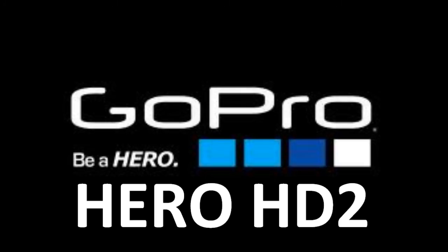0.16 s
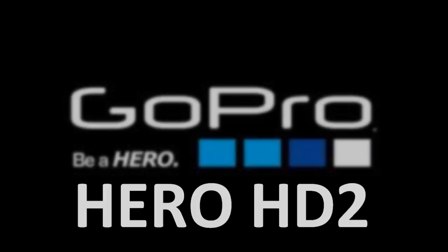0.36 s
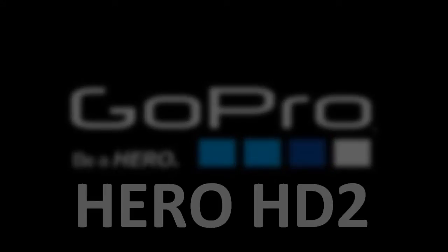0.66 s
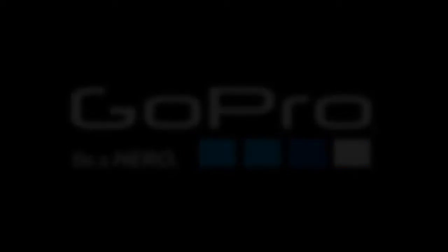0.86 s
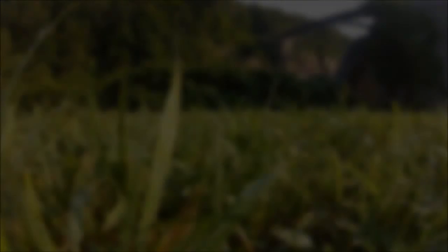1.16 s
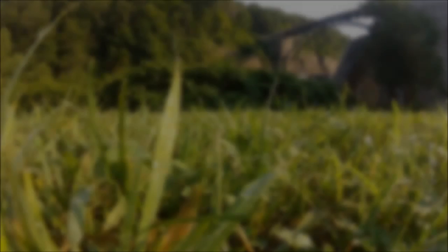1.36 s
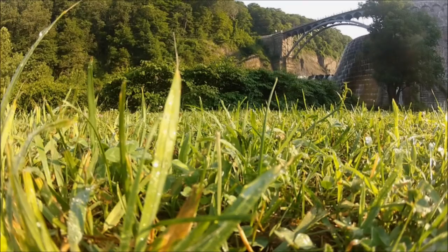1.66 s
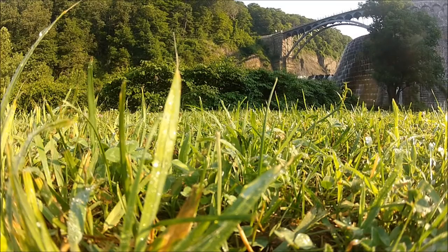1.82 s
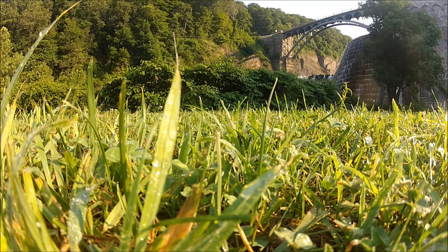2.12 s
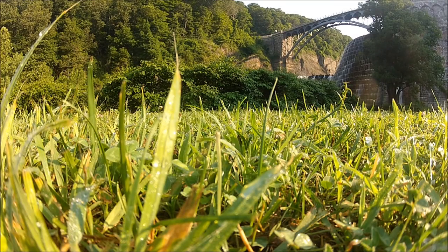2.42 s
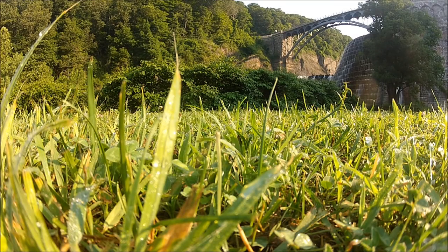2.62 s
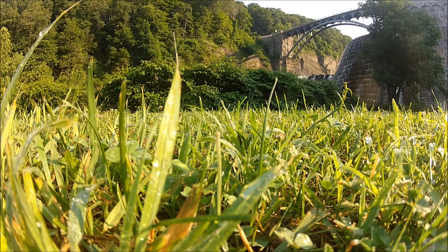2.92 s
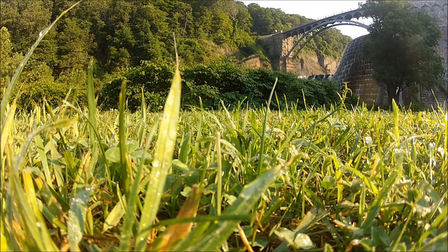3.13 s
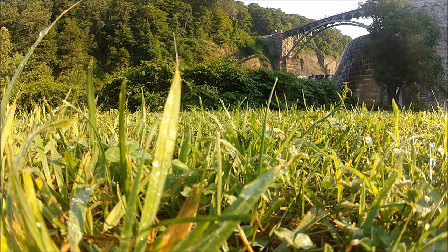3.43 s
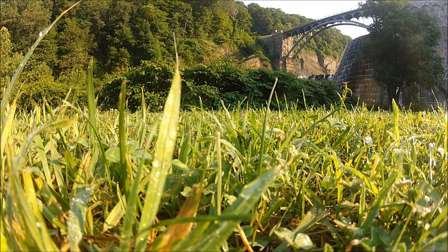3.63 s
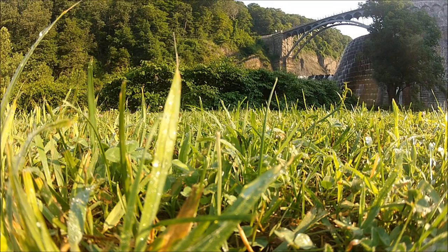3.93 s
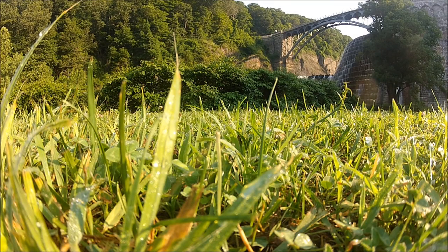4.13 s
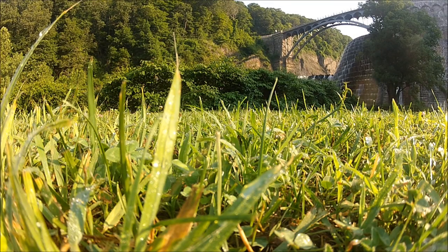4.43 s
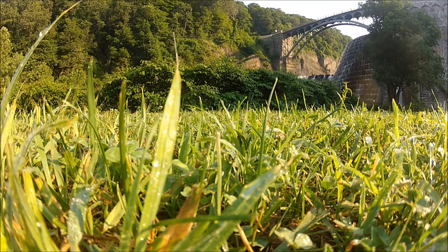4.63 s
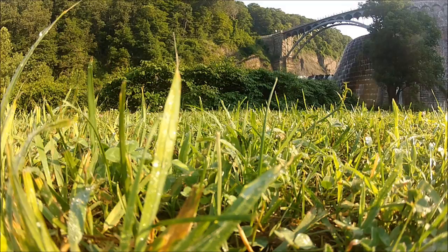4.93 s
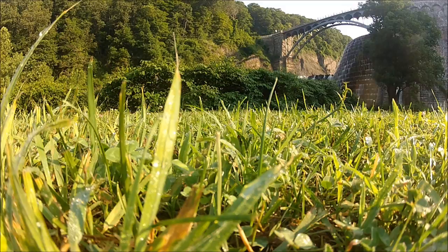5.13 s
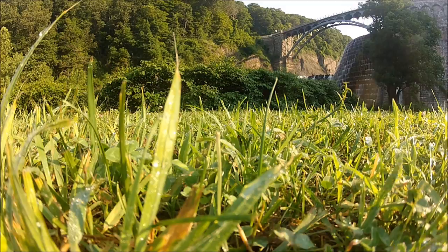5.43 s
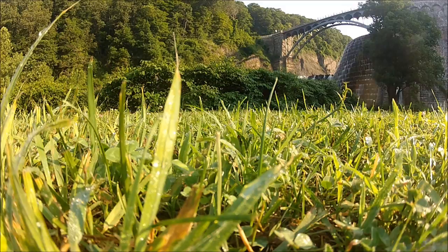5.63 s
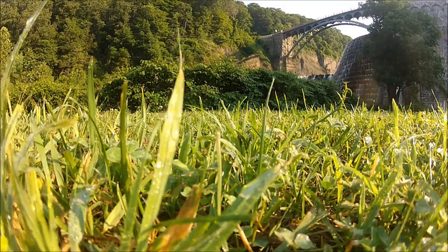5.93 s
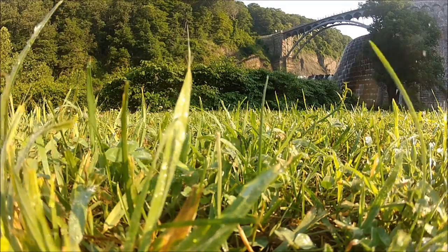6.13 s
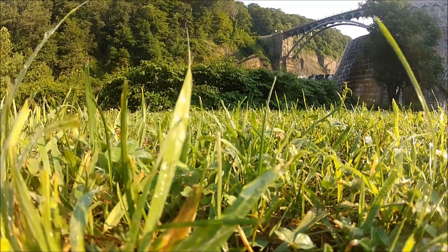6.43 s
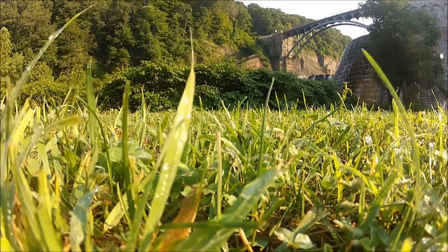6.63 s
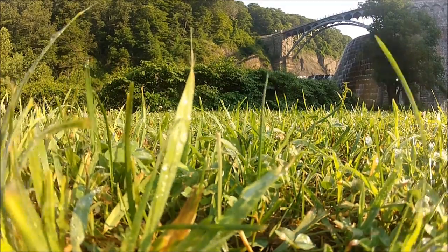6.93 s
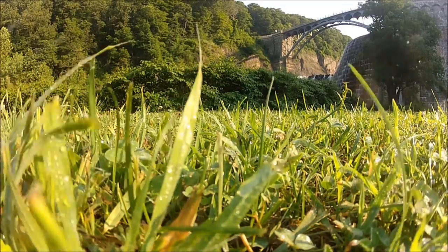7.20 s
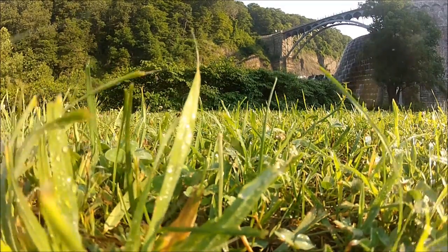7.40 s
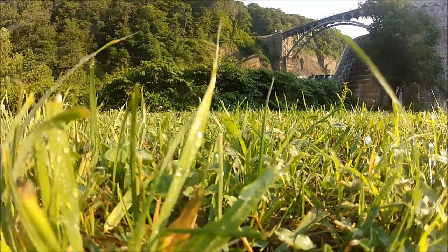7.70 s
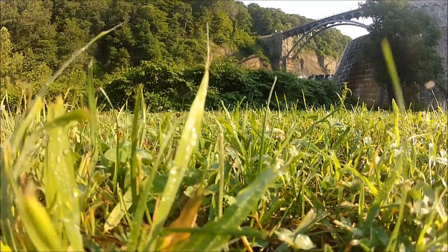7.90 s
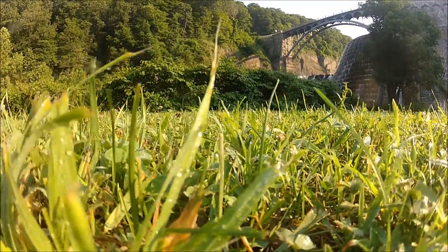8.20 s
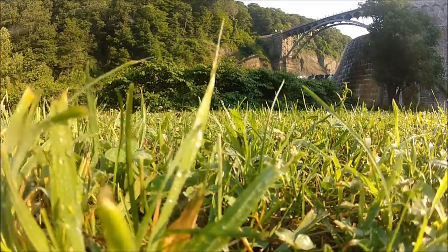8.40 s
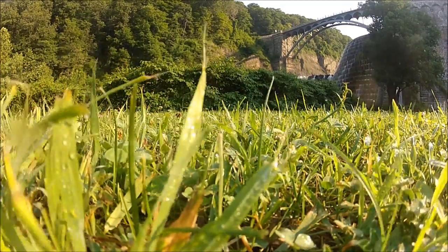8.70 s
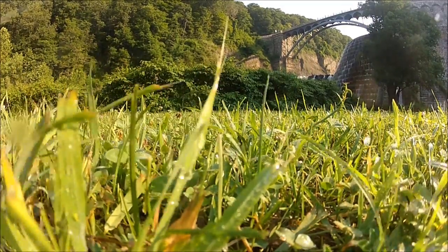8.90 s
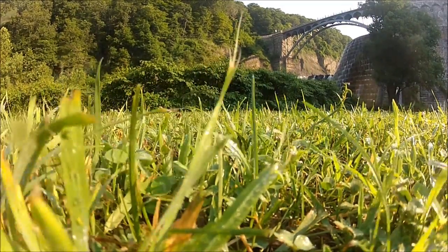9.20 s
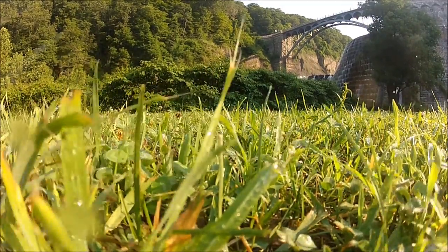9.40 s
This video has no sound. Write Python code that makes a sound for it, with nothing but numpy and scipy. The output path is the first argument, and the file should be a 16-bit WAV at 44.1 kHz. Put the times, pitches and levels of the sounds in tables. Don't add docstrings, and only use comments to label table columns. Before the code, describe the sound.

Faint distant river noise swells in, then a small drone's motors chirp, rattle and spin up into a loud, buzzing, breathy hum outdoors.

```python
import sys
import numpy as np
from scipy import signal
from scipy.fft import rfft, irfft, next_fast_len
from scipy.io import wavfile
from scipy.ndimage import uniform_filter1d

SR = 44100
rng = np.random.default_rng(int(sys.argv[2]) if len(sys.argv) > 2 else 0)


def persist_wave(psi):
    counts = np.round(np.clip(psi, -1, 1) * 32767).astype(np.int16)
    wavfile.write(sys.argv[1], SR, np.atleast_2d(counts).T)


def volts_from_db(level):
    exponent = np.asarray(level, float) / 20
    return 10 ** exponent


N = 421155
T = np.arange(N) / SR

# (time [s], speed [turns/s])
THROTTLE = [(5.3, 4.3), (5.68, 43.91), (5.77, 72.17), (5.82, 63.24), (6.16, 68.1), (6.58, 67.13),
            (6.8, 91.71), (6.98, 87.86), (7.12, 85.71), (8.31, 90.15), (8.73, 94.56), (8.93, 92.59),
            (9.23, 96.1), (9.29, 94.06), (9.55, 94.17)]
# (time [s], gain [dB])
RECORDER_GAIN = [
    (5.5, -0.5),
    (5.9, -4),
    (6.3, -5),
    (6.6, -6),
    (6.95, -10.5),
    (7.5, -12.5),
    (9.55, -13.5),
]
# (frequency [Hz], level [dB])
THIRD_HARMONIC = [(270, -9), (400, -9), (450, -9.5), (490, -15.5), (525, -14.5), (565, -11.5)]
SHAFT_ORDERS = [1, 3, 9, 17, 18]
SHAFT_DB = [-37.5, -39.5, -52.5, -49.5, -49]
HUM_ORDERS = [5, 5, 7, 7, 8, 8, 8, 8, 8, 10, 10, 11, 12, 12, 12, 12, 12, 13, 13, 14, 14, 14, 14, 14, 15, 16,
              16, 16, 28]
# (from [s], to [s], first level [dB rms], last level [dB rms])
HUM_SINGS = [(6.07, 6.72, -41.5, -37), (6.9, 8.3, -38.5, -41), (5.9, 7.2, -42.5, -46),
             (8.5, 9.55, -44, -43.5), (5.75, 5.79, -36, -37), (6.05, 6.3, -31, -33.5),
             (6.62, 6.74, -38, -36), (6.88, 7.15, -42, -38.5), (8.1, 9.55, -39.5, -39),
             (6.05, 6.55, -40, -44.5), (6.9, 9.55, -42.5, -39), (6.01, 6.62, -37, -39),
             (5.68, 5.73, -44.5, -37), (5.92, 6.07, -28, -29.5), (6.1, 6.72, -34, -40),
             (6.87, 7.2, -40, -38), (7.4, 9.55, -43, -42.5), (5.82, 5.5, -39, -36),
             (6.13, 6.66, -33.5, -35), (5.82, 5.96, -29.5, -29.5), (5.96, 6.72, -30, -29),
             (6.78, 7.2, -38.5, -40.5), (7.3, 8.7, -49, -44.5), (8.8, 9.55, -39.5, -38),
             (5.81, 5.88, -28.5, -34), (5.81, 5.93, -37, -40), (6.15, 6.75, -44, -41),
             (6.8, 9.55, -49.5, -45), (6.0, 6.15, -44, -40)]
WHINE_TONES = [(42, 0), (42, 0), (42, 0), (42, 0), (42, 0), (49, 0), (49, 0), (84, 0), (126, 0), (63, 0),
               (63, 0), (63, 0), (56, 0), (56, 0), (56, 0), (56, 0), (52, 0), (-52, 1), (-42, 1), (-42, 1),
               (-77, 1), (-63, 1), (-70, 1), (-126, 2), (147, -1), (168, -1)]
# (from [s], to [s], first level [dB rms], last level [dB rms])
WHINE_SINGS = [(5.56, 5.66, -41, -40), (5.74, 5.8, -40, -40), (5.84, 5.96, -38, -36), (6.7, 8.8, -45, -30),
               (8.8, 9.55, -31.5, -33.5), (5.78, 5.83, -33, -40), (6.84, 6.95, -39, -41),
               (5.88, 6.75, -28.5, -29), (5.82, 5.93, -31, -30), (6.63, 7.4, -47, -41),
               (6.85, 8.4, -37.5, -41), (8.5, 9.55, -46, -46), (6.38, 6.68, -38, -26.5),
               (6.68, 6.81, -34, -35.5), (6.88, 8.3, -44, -41.5), (8.11, 8.2, -36, -37),
               (6.55, 6.82, -33.5, -38), (6.8, 7.07, -37, -40), (5.95, 6.9, -28, -34),
               (6.95, 8.4, -43, -46), (5.74, 5.8, -25, -31), (5.85, 5.96, -30, -35),
               (6.18, 6.35, -35, -33.5), (7.0, 8.3, -41, -43), (8.3, 9.55, -40, -46), (6.83, 7.0, -35, -35)]
# (time [s], level [dB])
COIL_LOCK = [
    (5.3, -70),
    (5.304, -39),
    (5.35, -43),
    (5.37, -50),
    (5.45, -48),
    (5.7, -46),
    (5.9, -60),
]
# (frequency [Hz], level [dB])
BUFFET_SHAPE = [(20, -21), (50, -1), (100, 1), (220, 2), (400, 0.5), (650, -0.5), (1000, -13.5),
                (1600, -31), (3000, -50)]
# (frequency [Hz], level [dB])
HISS_SHAPE = [(500, -38), (900, 1), (1400, 0), (1750, -3), (2500, -1), (3100, -1), (3450, -5.5),
              (4200, -5.5), (6000, -15.5)]
# (frequency [Hz], level [dB])
BUZZ_SHAPE = [(2800, -30), (3450, -8), (3800, 8), (4100, 3.5), (4450, -4.5), (5000, 2.5), (5400, 1.5),
              (6000, 2.5)]
# (time [s], level [dB])
POLE_SNAPS = [
    (5.366, -35),
    (5.45, -37.5),
    (5.6, -29.5),
    (5.9, -29),
    (6.3, -48),
]
# (centre [Hz], width [Hz], level [dB])
FRAME_MODES = [(303, 48, 13), (617, 85, 11), (780, 91, 2.5), (1388, 110, 10), (1960, 240, 0)]
# (from [s], to [s], first level [dB], last level [dB])
SHUDDER = (5.57, 5.79, -35, -29)
# (time [s], angle [turns])
LAGGING_TURNS = [
    (5.45, 0),
    (5.672, 3),
    (5.775, 5),
    (6.19, 14),
    (6.4, 19),
    (7, 33.6),
    (9.55, 98),
]
# (time [s], level [dB])
SCRAPE = [
    (5.5, -50),
    (5.7, -30.5),
    (5.95, -33.5),
    (6.4, -34.5),
    (6.8, -40.5),
    (9.55, -41.5),
]
# (frequency [Hz], density [dB per Hz])
RIVER_SHAPE = [(15, -44), (25, -16.5), (108, -0.5), (416, -0.5), (1090, -6.5), (1960, -25.5), (3010, -20),
               (3770, -25), (4720, -20.5), (5400, -26.5), (7020, -22.5), (11900, -120)]
# (frequency [Hz], gain [dB])
RECORDER_EDGE = [(5300, -0.5), (5600, -3), (5800, -10), (5980, -12), (6100, -90)]

PWM_HZ = 8072
FLIGHT_TURNS_PER_S = 86
LAG_S = 0.25
SPOOL_S = 5.37
SURGE_S, SURGE_RISE_S, SURGE_HOLD_S, SURGE_FALL_S = 5.8, 0.013, 0.22, 0.083
GUST_S, GUST_WIDTH_S, GUST_DB = 8.36, 0.1, 2.5
COMMUTATIONS_PER_TURN = 42
# (level at flight speed [dB], power of speed [-], added by surge [dB])
BLADE_LAW, SECOND_LAW = (-4, 3.2, -0.71), (-5.5, 0.34, 5.2)
BUFFET_LAW, HISS_LAW = (-13, 2.14, 0.3), (-13, 1.69, 0.25)
RATTLE_LAW, UNBALANCE_LAW = (-19, 0.7, 3), (13.1, 1.97, 7.2)
BUZZ_DB, PULL, DRAG = -25.5, 3.6, 2.2
SWELL_S, SWELL_SHARE, SWELL_DB = 0.022, 0.092, 21
SWING_DB = 4
FLUTTER_DB = 3
FADE_START_S, FADE_END_S, RIVER_DB = 0.25, 5.02, -31.5


def rotor():
    keep = np.exp(-1 / (LAG_S * SR))
    asked = curve(THROTTLE) * (T > THROTTLE[0][0])
    return signal.lfilter([1 - keep], [1, -keep], asked)


def blades(speed, angle):
    db = law(BLADE_LAW, speed) + curve(RECORDER_GAIN) - gust()
    second_db = law(SECOND_LAW, speed) + gust()
    third_db = along(THIRD_HARMONIC, 6 * speed) + gust()
    passing = 2 * angle
    thump = np.cos(passing)
    thump += volts_from_db(second_db + 0.93 * wobble(25)) * np.cos(2 * passing + 0.6)
    thump += volts_from_db(third_db + 1.4 * wobble(25)) * np.cos(3 * passing + 0.46)
    return np.sqrt(2) * volts_from_db(db + 0.73 * wobble(30)) * thump


def orders(speed, angle):
    unbalance_db = law(UNBALANCE_LAW, speed) + curve(RECORDER_GAIN)
    out = np.zeros(N)
    for order, db in zip(SHAFT_ORDERS, SHAFT_DB):
        pull_db = unbalance_db if order > 6 else np.minimum(unbalance_db, 0)
        level = volts_from_db(db + pull_db + 4.4 * wobble(18)) * lift(order * speed)
        out += level * np.cos(order * angle + 1.2 * wobble(14) + rng.uniform(0, 6.73))
    return out


def whines(speed, angle):
    out = np.zeros(N)
    flutter_db = FLUTTER_DB * (speed / FLIGHT_TURNS_PER_S) ** 3
    tones = [(order, 0) for order in HUM_ORDERS] + [tuple(tone) for tone in WHINE_TONES]
    sings = list(HUM_SINGS) + list(WHINE_SINGS)
    for order, multiple in dict.fromkeys(tones):
        stretches = [spell(*row) for tone, row in zip(tones, sings) if tone == (order, multiple)]
        level = np.max(stretches, axis=0) * lift(order * speed + multiple * PWM_HZ)
        unsteady_db = 1.4 * wobble(35) + (0 < order < 40) * flutter_db * wobble(9)
        phase = order * angle + multiple * 2 * np.pi * PWM_HZ * T + 0.4 * wobble(40)
        out += level * volts_from_db(unsteady_db) * np.cos(phase)
    return np.sqrt(2) * out


def coil_lock():
    phase = np.pi * PWM_HZ * T + 0.3 * wobble(150)
    return np.sqrt(2) * sounding(COIL_LOCK) * volts_from_db(1.5 * wobble(120)) * np.cos(phase)


def buffet(speed):
    db = law(BUFFET_LAW, speed) + curve(RECORDER_GAIN) + gust()
    noise = volts_from_db(db + 0.75 * wobble(14)) * rush(shape(BUFFET_SHAPE), patchy_db=0.5)
    return noise * np.clip((T - 5.55) / 0.25, 0, 1)


def hiss(speed, angle):
    db = law(HISS_LAW, speed) + curve(RECORDER_GAIN) + gust()
    puffs_db = 2.46 * np.cos(2 * angle + 0.5) + 0.82 * np.cos(2 * (2 * angle + 0.29)) + 0.55 * wobble(40)
    scrape_share = volts_from_db(curve(SCRAPE) - np.max(SCRAPE, axis=0)[1])
    swing_db = SWING_DB * scrape_share * np.cos(2 * np.pi * curve(LAGGING_TURNS))
    puffs = volts_from_db(puffs_db + swing_db)
    return volts_from_db(db) * unit(puffs * rush(shape(HISS_SHAPE), patchy_db=1))


def coil_buzz(speed, angle):
    rel = speed / FLIGHT_TURNS_PER_S
    speeding_up = np.maximum(np.gradient(rel) * SR, 0)
    current = 1 + PULL * np.tanh(speeding_up * rel * 3.0) + 1.1 * surge() + DRAG * rel ** 3
    steps = COMMUTATIONS_PER_TURN * angle / (2 * np.pi)
    sharp_db = np.interp(T, [5.4, 5.6, 5.9], [-22, -12, -6])
    kicks = volts_from_db(sharp_db * (steps % 1) + 0.54 * np.cos(2 * angle + 0.5) + 2.0 * wobble(30))
    noise = filtered(kicks * rush(shape(BUZZ_SHAPE), patchy_db=1.5), lambda hz: hz > 3300)
    return volts_from_db(BUZZ_DB + curve(RECORDER_GAIN)) * current * unit(noise)


def pole_snaps(angle):
    steps = COMMUTATIONS_PER_TURN * angle / (2 * np.pi)
    snaps = volts_from_db(-24 * (steps % 1) + 4 * wobble(150))
    ring = rush(lambda hz: 1 / (1 + ((hz - 5300) / 450) ** 4), patchy_db=-3.5)
    return sounding(POLE_SNAPS) * unit(snaps) * ring


def rattle(speed):
    level = volts_from_db(law(RATTLE_LAW, speed) + curve(RECORDER_GAIN)) + spell(*SHUDDER) / 2
    return level * volts_from_db(3.06 * wobble(30)) * rush(frame, patchy_db=-0.5)


def wash(speed, angle):
    onset = (T > SPOOL_S) * np.clip((T - SPOOL_S) / 0.12 + 0.72, 0, 1)
    air = buffet(speed) + hiss(speed, angle)
    motor = coil_buzz(speed, angle) + pole_snaps(angle)
    return onset * (air + motor + rattle(speed))


def brush():
    strokes = np.exp(2.2 * (np.cos(2 * np.pi * curve(LAGGING_TURNS)) - 1))
    scrape = rush(lambda hz: 1 / (1 + ((hz - 2850) / 380) ** 4), patchy_db=1.5)
    return (T > SCRAPE[0][0]) * volts_from_db(curve(SCRAPE)) * unit(strokes) * scrape


def river():
    fade = np.clip((T - FADE_START_S) / (FADE_END_S - FADE_START_S), 0, 1)
    db = RIVER_DB + curve(RECORDER_GAIN) + 0.55 * wobble(2.46) + 0.21 * wobble(20)
    return fade * volts_from_db(db) * rush(shape(RIVER_SHAPE[:-1]), patchy_db=0)


def frame(hz):
    return np.sqrt(sum(volts_from_db(2 * db) / (1 + (2 * (hz - c) / w) ** 2) for c, w, db in FRAME_MODES))


def lift(hz):
    return np.sqrt(1 + frame(hz[::64]) ** 2).repeat(64)[:N]


def surge():
    since = T - SURGE_S
    release = np.exp(-np.maximum(since - SURGE_HOLD_S, 0) / SURGE_FALL_S)
    return np.clip(since / SURGE_RISE_S, 0, 1) * release


def gust():
    return GUST_DB * np.exp(-((T - GUST_S) / GUST_WIDTH_S) ** 2)


def law(rule, speed):
    db, power, surge_db = rule
    return db + power * 20 * np.log10(speed / FLIGHT_TURNS_PER_S + 1e-3) + surge_db * surge()


def spell(start, end, first_db, last_db):
    edge = SWELL_S + SWELL_SHARE * (end - start)
    return sounding([(start - edge, first_db - SWELL_DB), (start, first_db),
                     (end, last_db), (end + edge, last_db - SWELL_DB)])


def curve(rows):
    s, value = np.transpose(rows)
    return np.interp(T, s, value)


def sounding(rows):
    s, db = np.transpose(rows)
    return volts_from_db(np.interp(T, s, db, -140, -140))


def along(points, hz):
    f, v = np.transpose(points)
    return np.interp(np.log(hz + 1), np.log(f + 1), v)


def shape(points):
    return lambda hz: volts_from_db(along(points, hz))


def unit(x):
    return x / np.sqrt(np.mean(x ** 2))


def wobble(rate_hz):
    knots = rng.standard_normal(int(N * rate_hz / SR) + 4)
    return np.interp(T * rate_hz, np.arange(len(knots)), knots)


def filtered(x, response):
    m = next_fast_len(N + 8192)
    return irfft(rfft(x, m) * response(np.fft.rfftfreq(m, 1 / SR)), m)[:N]


def rush(response, patchy_db):
    z = signal.stft(rng.standard_normal(N + 512), nperseg=512)[2]
    field = uniform_filter1d(rng.standard_normal(z.shape), size=5, axis=0)
    field = uniform_filter1d(field, size=8, axis=1)
    noise = signal.istft(z * volts_from_db(patchy_db * unit(field)), nperseg=512)[1][:N]
    return unit(filtered(noise, response))


def scene():
    speed = rotor()
    angle = 2 * np.pi * np.cumsum(speed) / SR
    tones = blades(speed, angle) + orders(speed, angle) + whines(speed, angle) + coil_lock()
    return (tones + wash(speed, angle) + brush() + river())[None]


def band_limit(x):
    return signal.sosfilt(signal.butter(12, 15210, fs=SR, output="sos"), x)


def record(dry):
    def flat(hz):
        return volts_from_db(along(RECORDER_EDGE, hz)) / np.sinc(np.minimum(hz, 6000) / 12000)

    slow = signal.resample_poly(filtered(dry[0], flat), 40, 147, window=("kaiser", 2))
    slow = slow / (1 + np.abs(slow / 0.95) ** 6) ** (1 / 6)
    held = signal.resample_poly(slow.repeat(4), 147, 160)[:N]
    return band_limit(np.pad(held, (0, N - len(held)))[None])


dry = scene()
out = record(dry)
persist_wave(out)
```